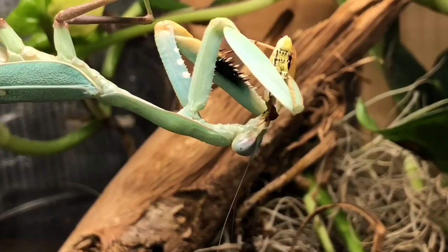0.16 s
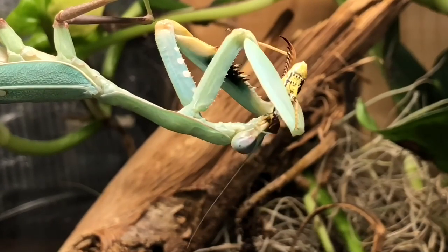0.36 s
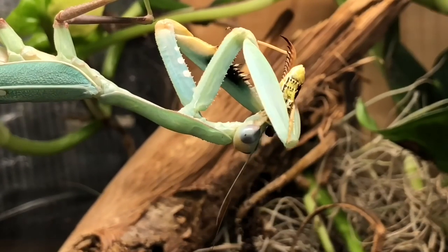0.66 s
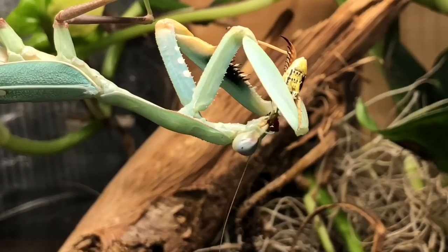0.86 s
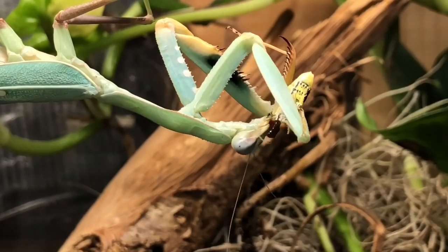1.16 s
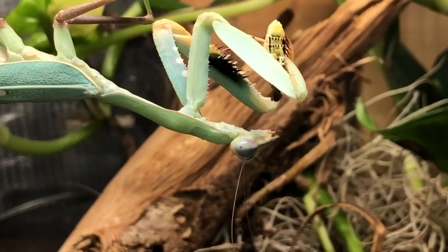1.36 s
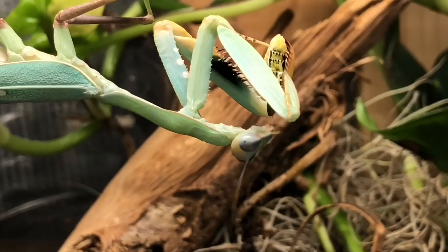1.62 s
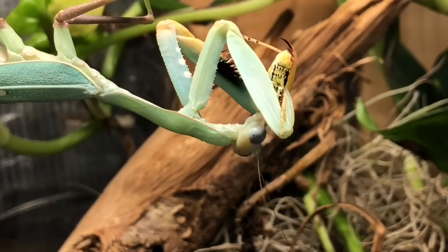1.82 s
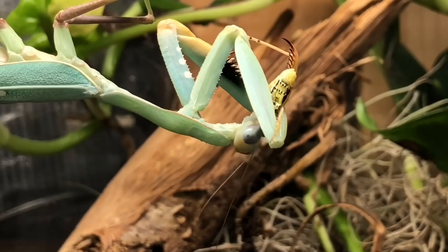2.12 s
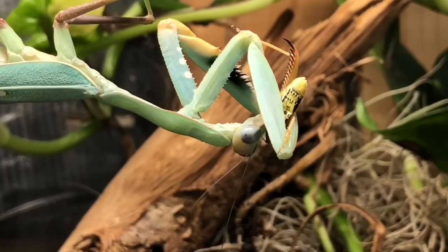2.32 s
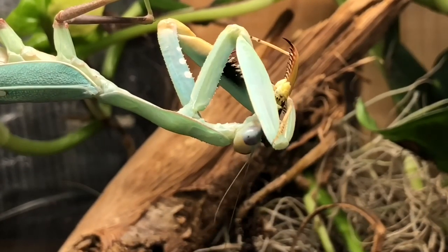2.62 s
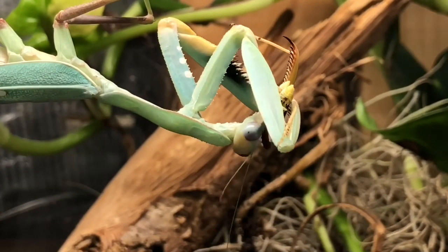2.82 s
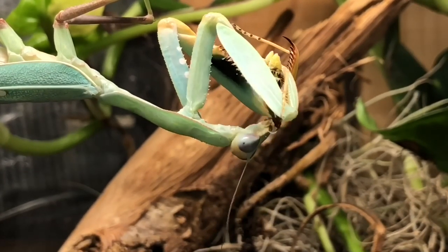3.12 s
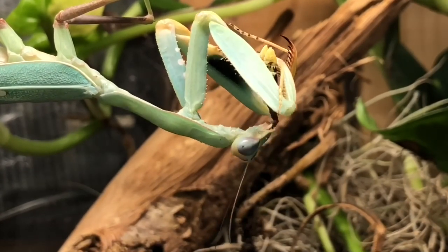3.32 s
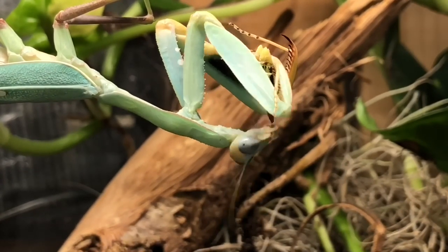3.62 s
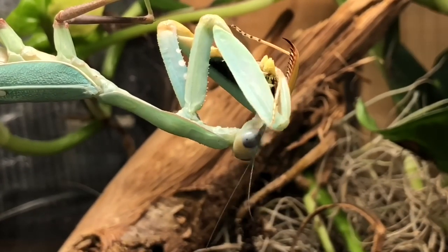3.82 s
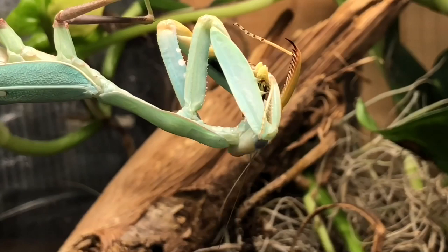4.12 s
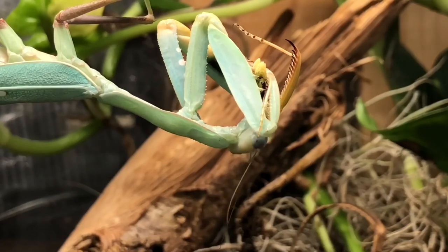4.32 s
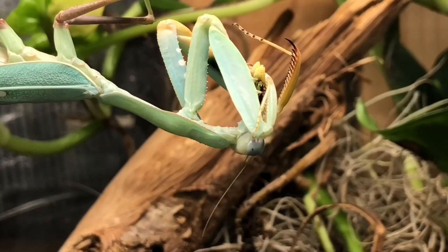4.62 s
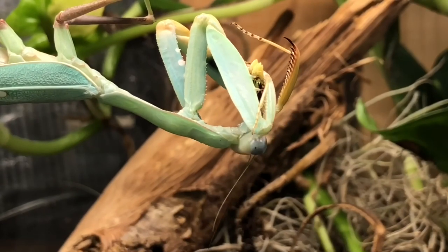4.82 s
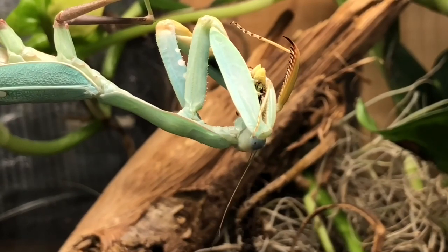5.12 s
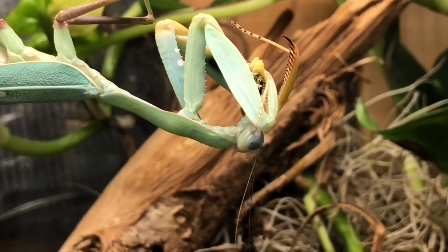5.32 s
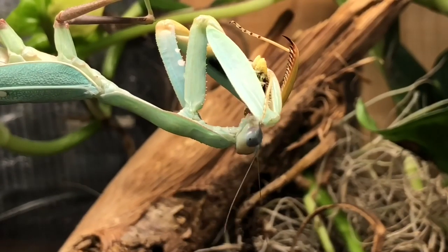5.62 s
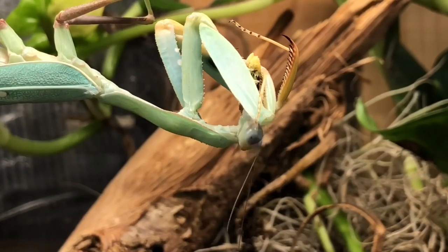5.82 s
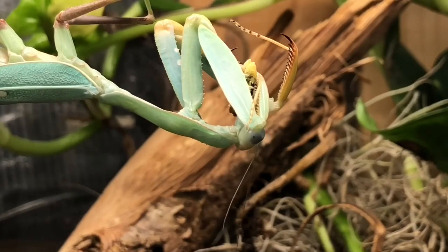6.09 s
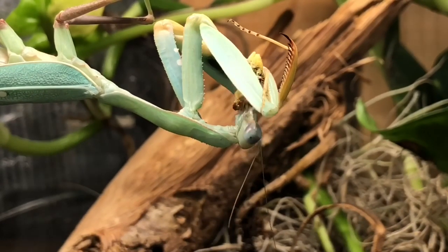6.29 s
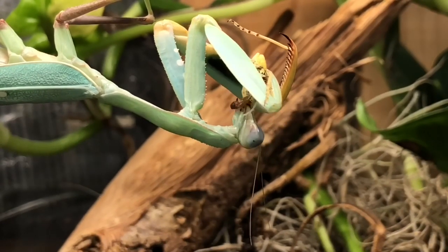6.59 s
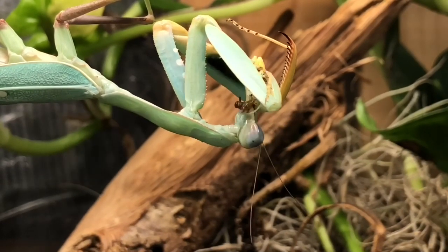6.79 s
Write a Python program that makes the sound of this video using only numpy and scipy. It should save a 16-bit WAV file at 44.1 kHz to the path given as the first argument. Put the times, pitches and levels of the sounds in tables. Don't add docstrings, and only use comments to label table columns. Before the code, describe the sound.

A mantis chews its insect prey very close up, with dry crackling snaps and small crunches over a thin steady hiss and faint electrical whine.

```python
import sys
import numpy as np
from scipy import signal
from scipy.fft import rfft, irfft
from scipy.io import wavfile
from scipy.ndimage import uniform_filter1d

SR = 44100
rng = np.random.default_rng(int(sys.argv[2]) if len(sys.argv) > 2 else 0)


def level_to_linear(level):
    exponent = np.asarray(level, float) / 20
    return 10 ** exponent


def unload_wav(signal):
    wavfile.write(
        sys.argv[1],
        SR,
        np.round(np.clip(np.atleast_2d(signal).T, -1, 1) * 32767).astype(np.int16),
    )


N = 306495
TIME = np.arange(N) / SR

# frequency in Hz, density in dB per Hz.
FLOOR_COLOUR = [(150, -42.5), (300, -40.5), (450, -41), (500, -23), (720, -25.5), (1000, -12), (1400, -5),
                (2100, -3), (2450, -2), (2700, -7.5), (4200, -14.5), (7000, -16.5), (11000, -21)]
# centre in Hz, width in Hz, gain in dB.
ROOM_RESONANCES = [(568, 60, 8), (782, 130, 7), (1102, 110, 9.5), (1350, 310, 7), (1600, 170, 7),
                   (1770, 22, 2), (2000, 280, 4), (9400, 610, 3.5), (12400, 250, 4), (13700, 740, 1.5)]
# time in seconds, centre in Hz, level in dB.
DISTANT_RUSH = [(0, 2250, -63), (0.499, 2200, -65), (0.95, 2150, -64), (1.199, 2000, -72), (1.6, 2200, -65.5),
                (1.999, 2150, -69.5), (2.448, 2250, -65), (2.798, 2100, -70.5), (3.7, 1900, -71),
                (4.2, 1850, -70), (5.0, 1950, -73), (5.499, 1720, -68), (6.2, 1700, -64), (6.95, 1700, -67.5)]
# time in seconds, level in dB.
DRAUGHT_LEVEL = [
    (0, -89),
    (5.199, -87),
    (5.5, -82),
    (5.901, -84.5),
    (6.2, -81),
    (6.45, -80),
    (6.65, -74),
    (6.95, -81),
]
# frequency in Hz, level in dB rms.
WHINE_TONES = [(906, -70), (1600, -69.5), (1790, -72.5), (3201, -79.5), (3580, -67), (4800, -93),
               (5368, -86), (6401, -79), (8000, -99.5), (11203, -98), (12800, -93.5), (14406, -89.5)]
# start in seconds, thud in dB, knock in dB over the thud.
PANEL_TAPS = [(1.23, -57, 4), (1.313, -62, 2), (1.814, -58, 16.5), (1.855, -54, 13.5), (2.14, -70, 19),
              (2.211, -70, 16), (2.256, -73, 12), (2.478, -57.5, 7), (2.52, -66, 13), (4.375, -63, 15),
              (5.242, -59, 5), (5.285, -61, 14), (5.325, -68, 15), (5.487, -54, 10.5), (5.533, -63, 11),
              (5.575, -56, -1), (6.178, -63, 1), (6.23, -58, -5)]
# start in seconds, length in seconds, treble in dB, shell ring in dB over the treble.
GRINDING_BOUTS = [(1.441, 0.096, -64, -14), (2.58, 0.24, -71.5, -6), (2.755, 0.033, -64, 3),
                  (2.819, 0.29, -69.5, 6), (3.11, 0.11, -60, 3), (3.274, 0.34, -64.5, 1),
                  (4.636, 0.18, -64.5, 5.5), (4.824, 0.068, -78, 11), (5.354, 0.15, -77, 2),
                  (5.67, .04, -64.5, 0), (5.82, .1, -68.5, -3), (5.955, .035, -63.5, -14),
                  (6.345, .065, -60, -5), (6.421, .02, -61.5, -7)]
# time in seconds, shell ring in dB, shell ring in Hz, brittle edge in dB over the ring.
FAINT_NIBBLES = [(0.315, -46, 3120, -18), (0.804, -47.5, 2780, -26), (1.6923, -49, 2870, -5),
                 (2.3367, -41, 2280, -8.5), (2.753, -50, 3100, -6), (2.875, -38.5, 2850, 2.5),
                 (3.1596, -51, 3340, -3), (3.1713, -48, 2630, 3), (3.203, -55, 3260, -6),
                 (3.2855, -44, 3290, 0), (3.324, -51, 3000, 2), (3.346, -43, 3130, 0),
                 (3.4154, -41.5, 4255, -4), (3.5617, -52, 3030, -8), (3.6681, -47.5, 3000, 2.5),
                 (4.273, -44, 2700, -33), (4.3228, -41, 3240, -8), (4.5699, -43.5, 3320, -23),
                 (4.7018, -45.5, 2770, -21), (4.725, -42.5, 2990, -11), (4.7626, -40, 3240, -27),
                 (4.8592, -38.5, 2800, -32), (5.355, -42, 2620, -14), (5.3807, -37.5, 2700, -24),
                 (5.4601, -42, 2310, -30), (5.5976, -43.5, 3220, -6.5), (5.6796, -47, 3000, -3),
                 (5.822, -42, 3280, -8), (6.6073, -45, 2750, -8), (6.75, -55, 2990, 9.5)]
# time in seconds, ring in dB, ring in Hz, edge in dB.
CRUMBLING_CRUNCHES = [(0.9178, -32.5, 1890, 9.5), (1.6085, -46.5, 2230, 11.5), (1.9505, -45.5, 3130, 3),
                      (1.9693, -50, 2660, 17), (2.5692, -29.5, 3190, -3.5), (2.764, -36.5, 2920, -6),
                      (2.7748, -46, 3230, 3), (2.8292, -33.5, 2810, -4), (2.8478, -41, 2760, -1),
                      (2.8988, -31.5, 2870, -5), (2.9337, -30, 2770, -1.5), (2.9819, -31, 2980, -4.5),
                      (3.0166, -35, 2000, -16), (3.031, -31, 3100, -10), (3.1175, -39.5, 3480, -1),
                      (3.1287, -40, 3340, -4), (3.147, -31.5, 2780, -30), (3.3785, -36.5, 2940, -6),
                      (3.4054, -33.5, 3500, -8), (3.4241, -40.5, 3370, 4), (3.4436, -39.5, 3470, -3.5),
                      (3.473, -37, 3050, -17), (4.253, -41.5, 3320, -5.5), (4.5919, -34, 2994, -6),
                      (4.7737, -26, 2100, -9.5), (4.8444, -40.5, 2744, -37), (5.3747, -32.5, 2830, -4.5),
                      (5.7544, -33, 2000, -1.5), (5.9059, -39.5, 3330, -44), (6.2981, -30, 2660, -21)]
# time in seconds, ring in dB, ring in Hz, edge in dB over the ring.
CLEAN_SNAPS = [(0.1662, -37.5, 3070, 9.5), (0.8619, -33, 2900, -8.5), (1.9752, -29.5, 3010, 13),
               (2.7688, -35.5, 3020, 5.5), (2.885, -36.5, 3020, -1), (2.9246, -28, 3260, -3),
               (2.9783, -35, 3200, -7), (2.9486, -37, 2740, -10), (2.96, -34.5, 3060, -6),
               (2.9905, -23.5, 3000, 2.5), (3.043, -27.5, 3640, -5.5), (3.0579, -27.5, 2860, -7.5),
               (3.1385, -27, 3980, 6.5), (3.1858, -20.5, 3010, -3), (3.1929, -34, 3560, -24),
               (3.2325, -38, 2930, -5), (3.2391, -34, 2780, -7), (3.2571, -16.5, 3170, 1.5),
               (3.3525, -35.5, 3240, -3), (3.4669, -35, 3160, -2), (3.4868, -31.5, 3010, -18),
               (3.4909, -34, 3655, -2), (3.5338, -24.5, 3020, -1.5), (3.5483, -19, 3450, -6),
               (3.6079, -8, 3330, 0), (4.289, -28.5, 2940, -7), (5.3674, -29.5, 2667, -13),
               (5.3911, -36, 2600, -27), (5.4411, -39.5, 2360, -30), (5.6331, -22.5, 2800, -2)]
# time in
# seconds, ring in dB, ring in Hz, edge in dB over the ring, breaking time in ms.
TIMED_BREAKS = [(0.9007, -35, 2080, 3.5, 3), (1.4762, -60, 2260, 7, 6), (1.5945, -51, 2530, -1, 18),
                (1.9815, -38.5, 2530, 3, 17), (2.359, -42, 2820, -1.5, 10.7),
                (2.8368, -29.5, 2884, -10, 6.5), (2.9063, -35, 3150, 1, 6), (2.9305, -29, 2520, -6, 2.4),
                (4.2832, -42, 2840, -14, 2.6), (3.1238, -37.5, 3470, 4, 3.9),
                (3.2632, -22.5, 3000, -8, 2.9), (5.6368, -27.5, 2600, 9, 11),
                (5.6422, -13.5, 3010, -17, 4.9), (5.6519, -25.5, 3120, 6.5, 4.5),
                (5.6555, -25.5, 2146, -23, 4), (5.7575, -38.5, 1390, -10.5, 11.7),
                (5.8347, -45, 3280, 1, 8.6), (5.836, -44.5, 1272, -22, 4.9),
                (5.8976, -43.5, 3330, 5.5, 17), (5.899, -39.5, 1415, -21, 3.5),
                (5.908, -41.5, 1444, -25, 6.4), (6.4009, -54, 3150, 10, 6.1),
                (4.8665, -43, 2840, -25, 9), (5.7575, -34, 3130, -7, 11)]
# mode in Hz, level in dB over the shell ring, t60 in seconds.
BODY_MODES = [(1075, -23.5, 0.017), (1600, -20, .01), (2064, -16, 0.01), (2724, -12.5, 0.0031),
              (3625, -6.5, 0.012)]
# frequency in Hz, gain in dB.
EDGE_RESPONSE = [(4600, 3.5), (5300, 3.5), (6400, 1.5), (8600, -3.5), (11000, -8), (14800, -7.5),
                 (15600, -4)]
# first echo in seconds, first echo in dB, diffuse echo in dB, t60 in seconds.
ENCLOSURE_WALLS = (.003, -13, -13, .017)
# frequency in Hz, gain in dB.
CLOSE_RESPONSE = [(300, -30), (800, -8), (1000, 0), (15700, 0), (16000, -17), (17000, -26)]

HISS_DB, HISS_TOP_HZ = -61.5, 15760
RUSH_WIDTH_HZ = 140
DRAUGHT_LO_HZ, DRAUGHT_HI_HZ = 12200, 13900
THUD_HZ, KNOCK_HZ, TAP_T60_S = 638, 1010, 0.019
BOUT_SLEW_S, GRIND_RING_HZ = 0.025, 3150
CRUMBS_PER_S, CRUMB_DB, CRUMB_SCATTER_DB, CRUMB_EDGE_DB, CRUMB_MS = 48, 11.5, 5, -5.5, 1.6
SNAP_MS, CRUNCH_MS, NIBBLE_MS = 2.45, 4.76, 4.7
SHELL_T60_S = 0.006
EDGE_HZ, EDGE_HZ_PER_DB, HARD_HZ_PER_DB = 7980, 295.5, 145
EDGE_WIDTH_HZ, FLAT_EDGE_DB = 6550, -0.5
HARD_DB, HARD_PURITY = -33, 0.37
CRACK_DB, CRACK_LO_HZ = -7.5, 970
BASS_CUT_HZ, TOP_HZ = 470, 16900


def level(x, db):
    return x * level_to_linear(db) / np.sqrt(np.mean(x ** 2))


def crest(x, db):
    return x * level_to_linear(db) / np.sqrt(2 * uniform_filter1d(x ** 2, size=60).max())


def ring(x, hz, t60):
    r = np.exp(-np.log(1000) / (t60 * SR))
    return signal.lfilter([1 - r, 0, r - 1], [1, -2 * r * np.cos(2 * np.pi * hz / SR), r * r], x)


def band(x, lo_hz, hi_hz):
    return signal.sosfilt(signal.butter(2, [lo_hz, hi_hz], "band", fs=SR, output="sos"), x)


def shape(x, table):
    hz = np.arange(N // 2 + 1) * SR / N + 1
    points_hz, points_db = np.transpose(table)
    return irfft(rfft(x) * level_to_linear(np.interp(np.log(hz), np.log(points_hz), points_db)), N)


def walk(rate):
    k = int(SR / rate)
    steps = np.repeat(rng.standard_normal(N // k + 1), k)
    return uniform_filter1d(uniform_filter1d(steps, k), k)[:N]


def add(out, s, sound):
    i = int(s * SR)
    out[i:i + len(sound)] += sound[:N - i]


def splinters(size, scatter_db):
    return rng.standard_normal(size) * level_to_linear(scatter_db * rng.exponential(size=size))


def hiss():
    hz = np.arange(N // 2 + 1) * SR / N
    room_db = sum(db * np.exp(-(2 * (hz - f) / width) ** 2) for f, width, db in ROOM_RESONANCES)
    room = level_to_linear(room_db) * (hz < HISS_TOP_HZ)
    noise = irfft(rfft(rng.standard_normal(N)) * room, N)
    return level(shape(noise, FLOOR_COLOUR), HISS_DB) * level_to_linear(0.9 * walk(3))


def distant_rush():
    s, centre_hz, db = np.transpose(DISTANT_RUSH)
    low_pass = signal.butter(2, RUSH_WIDTH_HZ / 2, fs=SR, output="sos")
    slow = signal.sosfilt(low_pass, rng.standard_normal((2, N)))
    turn = 2 * np.pi * np.cumsum(np.interp(TIME, s, centre_hz)) / SR
    rush = level(slow[0] * np.cos(turn) + slow[1] * np.sin(turn), 0)
    return rush * level_to_linear(np.interp(TIME, s, db) + 1.9 * walk(17))


def draught():
    s, db = np.transpose(DRAUGHT_LEVEL)
    air = band(rng.standard_normal(N), DRAUGHT_LO_HZ, DRAUGHT_HI_HZ)
    air = band(air, DRAUGHT_LO_HZ, DRAUGHT_HI_HZ)
    return level(air, 0) * level_to_linear(np.interp(TIME, s, db) + 1.5 * walk(12))


def whine():
    out = np.zeros(N)
    for hz, db in WHINE_TONES:
        gain = np.sqrt(2) * level_to_linear(db + 0.4 * walk(11))
        out += gain * np.sin(2 * np.pi * np.cumsum(hz + 1.2 * walk(13)) / SR)
    return out


def taps():
    out, t = np.zeros(N), TIME[:3000]
    for s, thud_db, knock_db in PANEL_TAPS:
        push = band(rng.standard_normal(len(t)) * np.exp(-t / 0.0022), 520, 1500)
        thud = crest(ring(push, THUD_HZ, TAP_T60_S / 2), thud_db - 6.5)
        knock = crest(ring(push, KNOCK_HZ, TAP_T60_S), thud_db + knock_db - 5)
        add(out, s, thud + knock)
    return out


def grinding():
    grit = splinters(N, scatter_db=3.0) * level_to_linear(5.5 * walk(150))
    bright = level(shape(band(grit, 3300, 19000), EDGE_RESPONSE), 0)
    ringing = level(band(grit, GRIND_RING_HZ / 1.2, GRIND_RING_HZ * 1.1), 0)
    out = np.zeros(N)
    for s, length, db, ring_db in GRINDING_BOUTS:
        gate = 1.0 * (TIME > s) * (TIME < s + length)
        gate = uniform_filter1d(gate, size=int(BOUT_SLEW_S * SR))
        out += gate * level_to_linear(db) * (bright + level_to_linear(ring_db) * ringing)
    return out


def crumbs():
    luck = rng.uniform(-1, 1, (int(CRUMBS_PER_S * N / SR), 3))
    times = (np.arange(len(luck)) + 0.5 + luck[:, 0] / 2) / CRUMBS_PER_S
    rows = []
    for s, length, db, ring_db in GRINDING_BOUTS:
        for t, (_, u, v) in zip(times, luck):
            if s < t < s + length:
                crumb_db = db + ring_db + CRUMB_DB + CRUMB_SCATTER_DB * u
                hz = GRIND_RING_HZ * (1 + 0.043 * v)
                rows.append((t, crumb_db, hz, CRUMB_EDGE_DB - ring_db, CRUMB_MS))
    return rows


def fracture_burst(ms):
    t = TIME[:1500]
    spread = 1 - np.exp(-(t / 0.001) ** 2)
    return splinters(len(t), scatter_db=3.0) * spread * np.exp(-(t / (0.00064 * ms)) ** 1.61)


def body_ring(burst, brittle_db):
    out = np.zeros(len(burst))
    for hz, db, t60 in BODY_MODES:
        shift, uneven = rng.uniform(-1.22, 1, 2)
        out += level_to_linear(db + 4 * uneven + brittle_db) * ring(burst, hz * (1 + 0.08 * shift), t60)
    return out


def brittle_edge(burst, edge_hz):
    lo_hz = max(edge_hz - EDGE_WIDTH_HZ / 2, 4500.0)
    hi_hz = min(edge_hz + EDGE_WIDTH_HZ / 2, 17000.0)
    return band(burst, lo_hz, hi_hz) + level_to_linear(FLAT_EDGE_DB) * band(burst, 4600, 17000)


def bites(rows):
    rings, edges = np.zeros(N), np.zeros(N)
    for s, ring_db, hz, edge_db, ms in rows:
        burst = fracture_burst(ms)
        over_db = max(ring_db - HARD_DB, 0)
        shell = ring(ring(burst, hz, SHELL_T60_S), hz, 0.0015)
        brittle_db = np.clip(0.63 * (edge_db + 10), -9, 4) - HARD_PURITY * over_db
        body = body_ring(burst, brittle_db)
        crack_db = min(edge_db, 3) + CRACK_DB - HARD_PURITY * over_db
        crack = band(burst, CRACK_LO_HZ, 4600)
        edge_hz = EDGE_HZ + EDGE_HZ_PER_DB * max(edge_db, 0) + HARD_HZ_PER_DB * over_db
        edge = brittle_edge(burst, edge_hz)
        start = s - 0.0007
        add(rings, start, crest(shell + body, ring_db) + crest(crack, ring_db + crack_db))
        add(edges, start, crest(edge, ring_db + edge_db))
    return rings + shape(edges, EDGE_RESPONSE)


def enclosure(x):
    first_s, first_db, diffuse_db, t60 = ENCLOSURE_WALLS
    t = TIME[:3000]
    echo = rng.standard_normal(len(t)) * np.exp(-np.log(1000) * t / t60) * (t > first_s)
    echo = echo * level_to_linear(diffuse_db) / np.sqrt(np.sum(echo ** 2))
    echo[[0, int(first_s * SR)]] = 1, level_to_linear(first_db)
    return signal.fftconvolve(x, echo)[:N]


def chewing():
    rows = list(TIMED_BREAKS)
    for kind, ms in ((CLEAN_SNAPS, SNAP_MS), (CRUMBLING_CRUNCHES, CRUNCH_MS), (FAINT_NIBBLES, NIBBLE_MS)):
        rows += [(*row, ms) for row in kind]
    chew = bites(rows) + bites(crumbs()) + grinding()
    return shape(enclosure(chew), CLOSE_RESPONSE)


def scene():
    cut = signal.butter(8, BASS_CUT_HZ, "high", fs=SR, output="sos")
    near = signal.sosfilt(cut, chewing() + taps())
    return (near + whine() + hiss() + distant_rush() + draught())[None]


def roll_off(x):
    return signal.sosfilt(signal.butter(12, 16970, fs=SR, output="sos"), x)


def record(dry):
    top_cut = signal.ellip(8, 0.2, 70, TOP_HZ, fs=SR, output="sos")
    mix = signal.sosfilt(top_cut, dry)
    return roll_off(mix)


dry = scene()
out = record(dry)
unload_wav(out)
```